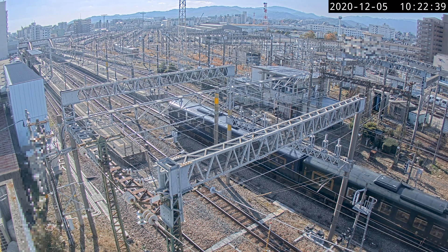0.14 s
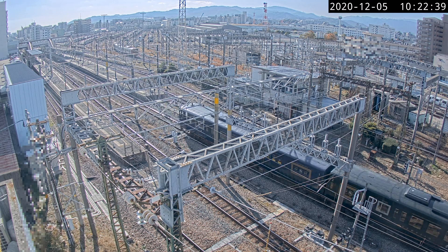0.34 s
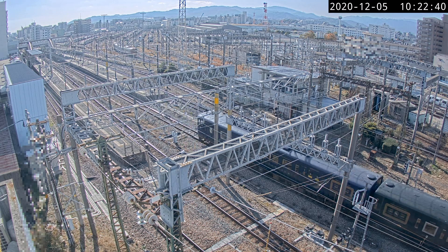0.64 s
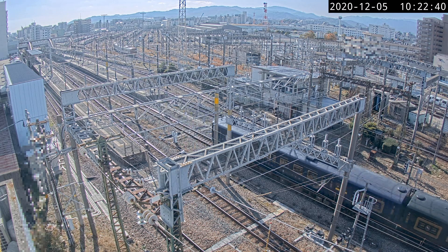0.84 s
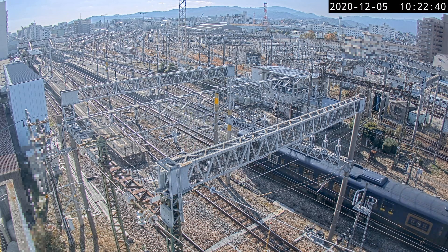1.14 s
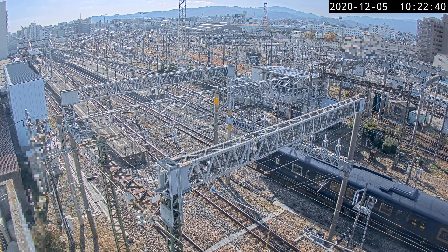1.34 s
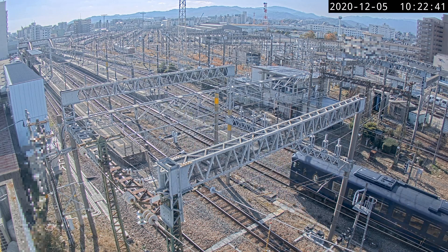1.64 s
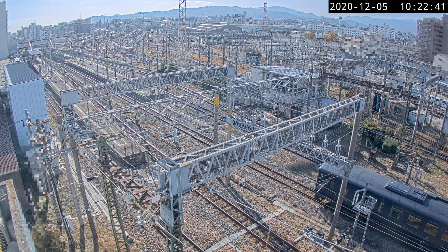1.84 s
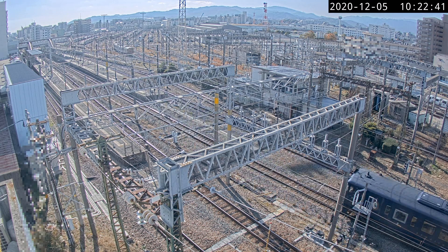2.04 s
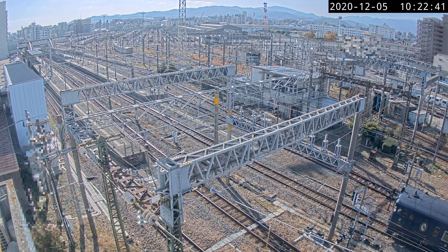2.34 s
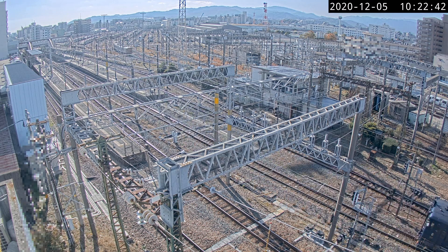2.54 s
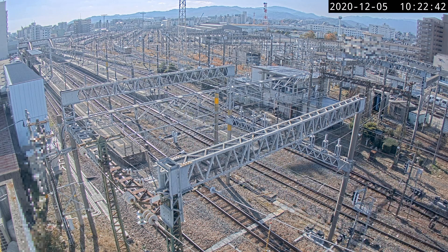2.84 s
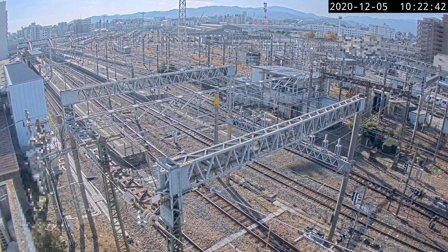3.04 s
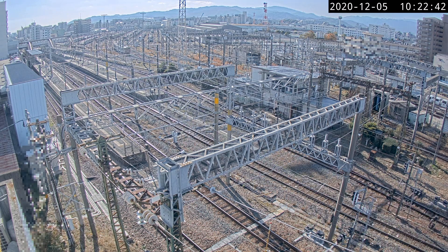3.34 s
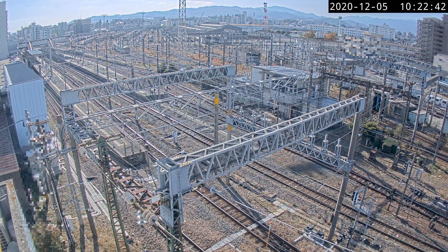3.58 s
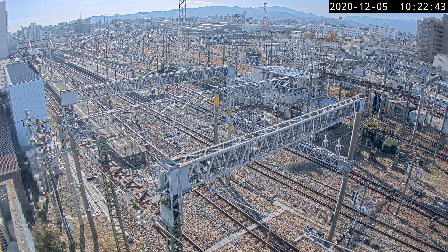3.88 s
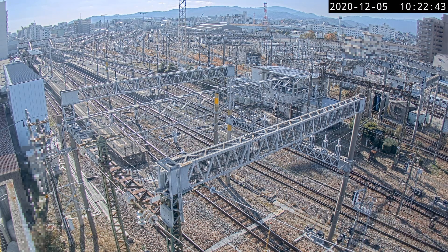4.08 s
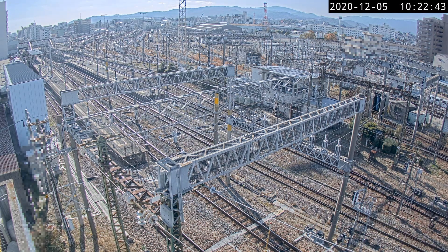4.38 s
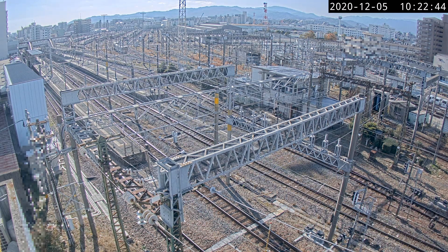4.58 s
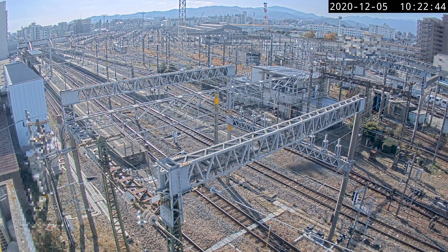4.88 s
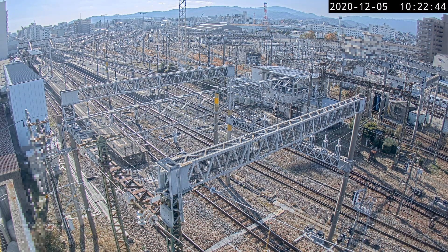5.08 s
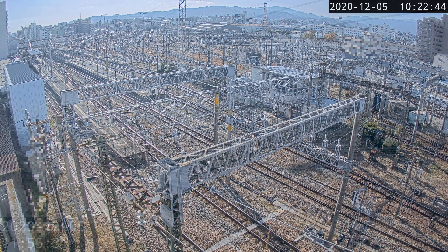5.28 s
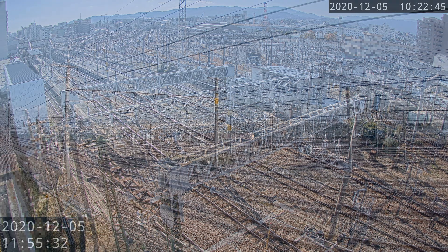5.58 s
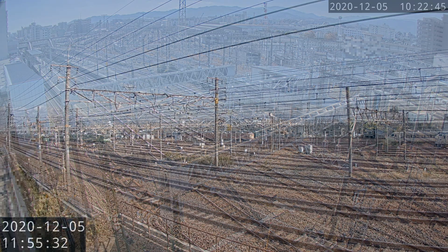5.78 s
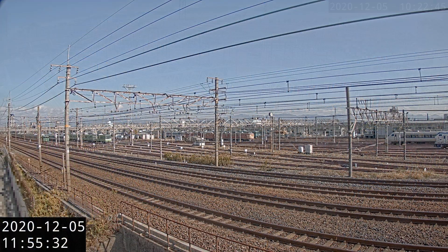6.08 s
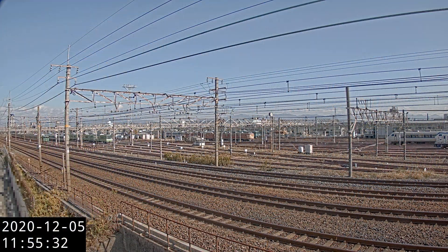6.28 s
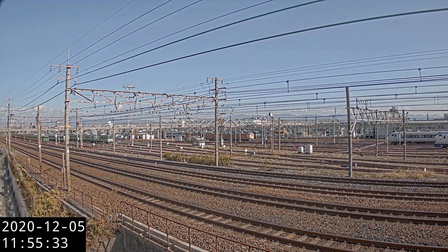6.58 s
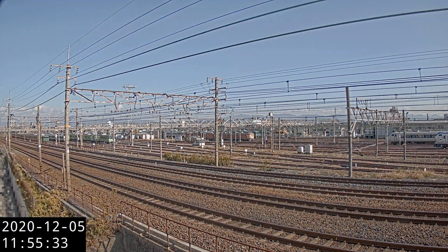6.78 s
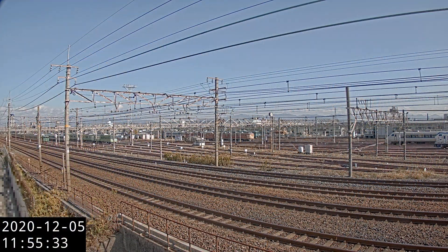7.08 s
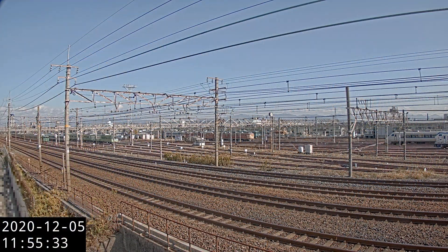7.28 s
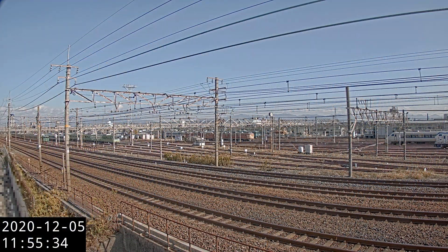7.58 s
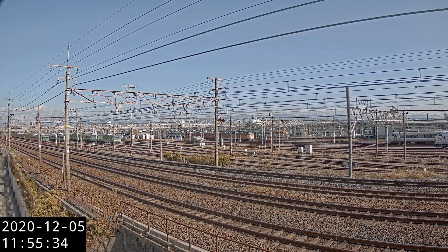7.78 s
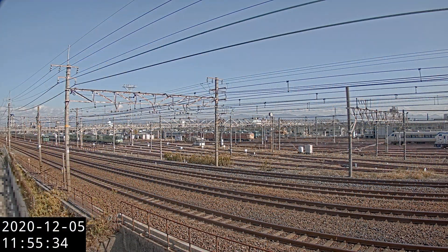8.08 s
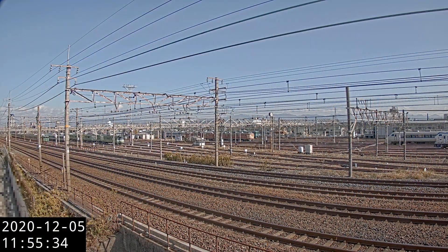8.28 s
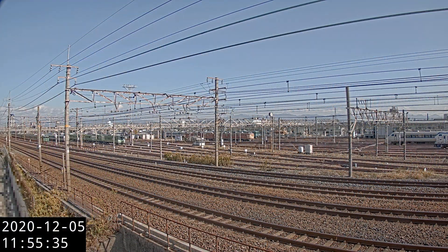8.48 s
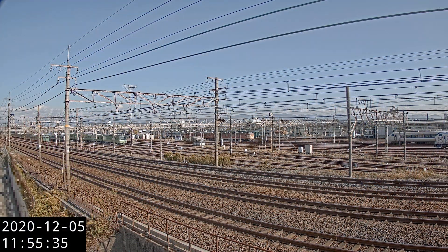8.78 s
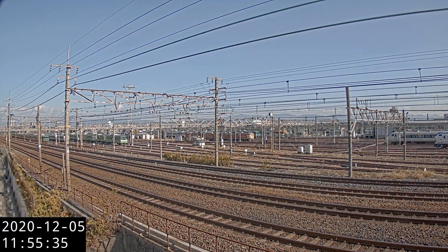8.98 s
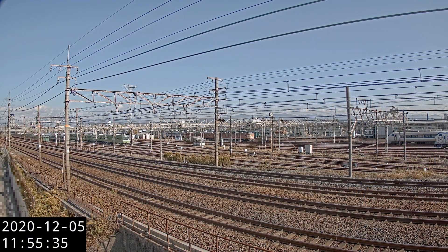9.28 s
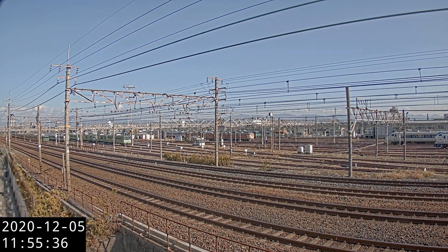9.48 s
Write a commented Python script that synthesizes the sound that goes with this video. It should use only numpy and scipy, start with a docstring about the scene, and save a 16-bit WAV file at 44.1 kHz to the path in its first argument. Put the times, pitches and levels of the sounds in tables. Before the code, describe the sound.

Steely train roar with thin piercing flange whines and dull joint thuds fades away, giving way to a quiet open yard's low hum.

```python
"""An electric train rolls through a wide rail yard below a fixed outdoor camera and draws away.
Its wheel roar is filtered noise in four bands; two flanges sing as trembling sines that sink as they fade.
Thuds, a drone, rumble and ringing rails join in. The sound then dissolves to the faint murmur of
another yard, made of steady noise bands. Resonances of each camera's housing colour the roar and
the murmur; both channels are alike."""
import sys
import numpy as np
from scipy import signal
from scipy.fft import rfft, irfft, next_fast_len
from scipy.io import wavfile

SR = 44100
rng = np.random.default_rng(int(sys.argv[2]) if len(sys.argv) > 2 else 0)


def materialize(psi):
    """Save the field psi as 16-bit PCM at rate SR to the path in sys.argv[1].

    A 1-D psi becomes a single channel; in a 2-D psi each row is a channel.
    """
    bounded = np.clip(np.atleast_2d(psi).T, -1, 1)
    quanta = np.round(bounded * 32767).astype(np.int16)
    wavfile.write(sys.argv[1], SR, quanta)


N = 424669
TIME = np.arange(N) / SR  # s
FREQ = np.linspace(1, SR / 2, 8192)  # Hz, the grid of every spectrum
FADE_START_S, FADE_END_S = 5.35, 6.078  # the train dissolves into the quiet yard

# Standing waves in the housing of the camera over the train.
# Each row: centre in Hz, width in Hz, peak or notch in dB.
TRAIN_HOUSING = [(797, 427, 9), (1080, 510, -4.5), (2224, 1240, 12), (2802, 543, -12), (4143, 380, 7),
                 (4875, 793, -6.5), (5820, 1500, 5), (6500, 520, -6.5), (7300, 836, 3)]
# How these change for sound from behind the camera.
# Each row: centre in Hz, width in Hz, peak or notch in dB.
REAR_CHANGE = [(345, 350, 5), (2156, 210, -6.5), (2390, 260, 1.5), (2900, 900, -4), (3930, 320, 5.5),
               (4600, 300, -4), (5230, 2300, 7), (8700, 1300, 10.5), (9850, 700, -2), (10500, 700, 6),
               (12700, 840, -8)]
# Standing waves in the housing of the second camera.
# Each row: centre in Hz, width in Hz, peak or notch in dB.
QUIET_HOUSING = [(852, 217, 15), (990, 420, -12), (2177, 780, 14), (2720, 510, -9.5), (3690, 1295, 10.5),
                 (4820, 278, -8.2), (5429, 740, 8), (8800, 1500, -5)]


def undb(db):
    """The decibel is logarithmic: twenty of them multiply the amplitude by ten."""
    return 10 ** (np.asarray(db) / 20)


def unit(x):
    """Effective strength is the root mean square, scaled here to one."""
    return x / np.sqrt(np.mean(x ** 2))


def curves(table):
    """Linear interpolation in time of every column after the first, which holds seconds."""
    seconds, *columns = np.transpose(table)
    return [np.interp(TIME, seconds, column) for column in columns]


def colour(points):
    """Spectral envelope: gain per frequency from (Hz, dB) points, joined on a logarithmic pitch axis."""
    hz, db = np.transpose(points)
    return undb(np.interp(np.log(FREQ), np.log(hz), db))


def resonances(modes):
    """Resonance: each mode adds a bell-shaped peak or notch in dB to the gain per frequency."""
    total_db = 0
    for hz, width_hz, db in modes:
        detuning = 2 * (FREQ - hz) / width_hz
        total_db = total_db + db / (1 + detuning ** 2) ** 2
    return undb(total_db)


def band(low_hz, high_hz, order=16):
    """Band-pass gain: neighbouring bands that share an edge and order add up to flat power."""
    below = (low_hz / FREQ) ** order
    above = (FREQ / high_hz) ** order
    return ((1 + below) * (1 + above)) ** -.5


def noise(gain):
    """Spectral shaping: white noise takes the given gain per frequency, at unit rms."""
    size = next_fast_len(N, True)
    bin_hz = np.arange(size // 2 + 1) * SR / size
    spectrum = rfft(rng.standard_normal(size)) * np.interp(bin_hz, FREQ, gain)
    return unit(irfft(spectrum, size)[:N])


def walk(rate_hz):
    """Random modulation: chance values, rate_hz of them a second, joined by lines at unit rms."""
    knots = rng.standard_normal(N // 10)
    return unit(np.interp(TIME * rate_hz, np.arange(len(knots)), knots))


def strike(start_s, decay_s, rise_s):
    """Damped impact: the envelope of a blow rises quickly and falls exponentially."""
    age_s = np.maximum(TIME - start_s, 0)
    return (1 - np.exp(-age_s / rise_s)) * np.exp(-age_s / decay_s)


def swell(centre_s, half_s):
    """Gaussian envelope: a smooth rise and fall, one at its centre."""
    return np.exp(-((TIME - centre_s) / half_s) ** 2)


def gone(halfway_s, scale_s):
    """Sigmoid transition: a smooth step from zero to one as the train leaves."""
    return .5 + .5 * np.tanh((TIME - halfway_s) / (2 * scale_s))


def microphone_hiss(db=-88):
    """Self-noise: the microphone adds a thin, even hiss."""
    return noise(band(8000, 16200)) * undb(db)


def patter(db=-84):
    """Amplitude modulation: uneven flicker turns a noise band into very faint crackling in the air."""
    flicker_db = np.clip(3 * walk(70), -6, 4)
    return noise(resonances(QUIET_HOUSING) * band(5000, 10500, order=10)) * undb(db + flicker_db)


def yard():
    """Superposed distant sources: wavering noise of far traffic and town, with a thin hiss of air above."""
    # Spectrum of the murmur. Each row: frequency in Hz, relative level in dB.
    murmur = [(25, -3.5), (60, 4.5), (150, -13), (400, -11), (700, -7.5), (1400, -23.5), (3500, -28.5),
              (7000, -40), (10500, -46), (15500, -66)]
    shape = colour(murmur) * resonances(QUIET_HOUSING)
    ground_db = -61 + 1.1 * walk(5.8)
    traffic_db = -54.5 + .5 * walk(6.6)
    air_db = -70 + 4 * swell(8.76, half_s=0.56) + .5 * walk(20)  # one soft swell of the hiss
    ground = noise(shape * band(18, 94)) * undb(ground_db)
    traffic = noise(shape * band(108, 2500)) * undb(traffic_db)
    air = noise(shape * band(2800, 16000)) * undb(air_db)
    return ground + traffic + air


def ticks():
    """Transient excitation: brief noise bursts near the microphone, coloured by the housing, tick and rattle."""
    # Each row: start in seconds, level in dB, rise in seconds, decay in seconds, lowest Hz, highest Hz.
    small_blows = [(5.325, -63, .004, 0.024, 5500, 8500), (5.455, -48, 0.0036, 0.023, 5200, 6800),
                   (5.49, -54, 0.0064, 0.038, 5500, 11000), (8.515, -56, 0.01, 0.045, 2900, 3200),
                   (8.61, -57, .001, 0.0078, 5200, 6500), (8.655, -54, .001, 0.01, 2200, 8000)]
    out = 0
    for start_s, db, rise_s, decay_s, low_hz, high_hz in small_blows:
        modes = [*TRAIN_HOUSING, *REAR_CHANGE] if start_s < FADE_END_S else QUIET_HOUSING
        burst = noise(resonances(modes) * band(low_hz, high_hz, order=10))
        out = out + undb(db) * strike(start_s, decay_s, rise_s) * burst
    return out


def rumble():
    """Ground-borne vibration: low noise wavers and eases as the train goes, with a few deeper buffets."""
    # Each row: centre in seconds, half length in seconds, level in dB.
    low_buffets = [(.13, .07, -44), (2.117, 0.07, -40), (3.98, .04, -44), (4.73, .07, -43),
                   (5.04, 0.17, -47)]
    level_db, fall_db_per_s, waver_db = -48.5, 1.1, 1.7
    buffets = sum(undb(db) * swell(s, half_s) for s, half_s, db in low_buffets)
    steady = undb(level_db - fall_db_per_s * TIME + waver_db * walk(8))
    return noise(band(42, 110, order=4)) * steady + noise(band(26, 80, order=6)) * buffets


def running_gear(db=-50):
    """Frequency modulation: the running gear's wavering drone comes and goes, strongest at 3.55 s."""
    # Each row: time in seconds, pitch in Hz, loudness as a gain.
    drone = [(0, 141, .4), (1.25, 145.5, 1.03), (1.7, 144, .4), (2.4, 146, .9), (2.9, 143, .3),
             (3.55, 137, 1.5), (3.85, 135, 0.086)]
    hz, loudness = curves(drone)
    phase = 2 * np.pi * np.cumsum(hz + 3 * walk(13)) / SR
    return np.sin(phase) * loudness * undb(db + 3 * walk(5.0))


def joints():
    """Impact excitation: wheels thud dully over rail joints, smeared by the yard."""
    # Each row: start in seconds, level in dB.
    thuds = [(0.799, -29.5), (2.26, -31), (2.77, -33.5), (3.295, -46), (3.44, -39), (3.96, -45),
             (5.231, -38.5), (5.298, -34), (5.44, -31.5)]
    blows = sum(undb(db) * strike(s, decay_s=.06, rise_s=0.0028) for s, db in thuds)
    return blows * noise(resonances(TRAIN_HOUSING) * band(170, 470, order=4))


def narrow_hiss(centre_hz, width_hz):
    """Narrow-band noise: only frequencies close to the centre pass."""
    return noise(1 / (1 + (2 * (FREQ - centre_hz) / width_hz) ** 4))


def rails():
    """Free vibration: the rails' narrow hiss swells and dies as the last coach leaves."""
    ring = narrow_hiss(5750, width_hz=700)
    return ring * undb(-50 + 1.2 * walk(25)) * swell(3.45, half_s=.6)


def bites():
    """Superposition of flange bites: pressure, then gains of upper wheel, scraping and lower wheel."""
    # A flange bites against the rail and both wheels sing.
    # Each row: centre in seconds, half length in seconds, pressure from 0 to 1, upper wheel in dB,
    # scraping in dB, lower wheel in dB.
    flange_bites = [(.08, 0.32, 0.1, -53, -42.5, -46), (0.638, 0.19, 0, -59.5, -56, -44.5),
                    (1.14, 0.14, 0.6, -34.5, -39, -46), (1.335, .08, 0.3, -39, -45, -53.5),
                    (1.87, 0.25, 0.9, -38, -37, -58), (2.445, .16, 0.5, -33.5, -38.5, -49.5),
                    (2.693, 0.11, 0, -48, -47, -44.5), (3.01, 0.047, 0, -44, -59, -70),
                    (3.345, 0.19, 0, -45.5, -46.5, -75), (3.736, 0.16, .1, -52, -52, -80),
                    (4.095, .06, 0, -57, -65, -85)]
    total = 0
    for s, half_s, pressure, *levels_db in flange_bites:
        strengths = [pressure, *undb(levels_db)]
        total = total + np.outer(strengths, swell(s, half_s))
    return total


def singing(hz, wobble_hz, flutter_db):
    """Stick-slip keeps a wheel mode going: its pitch trembles and its grip comes and goes."""
    phase = 2 * np.pi * np.cumsum(hz + wobble_hz * walk(220)) / SR
    return unit(np.sin(phase) * undb(flutter_db * walk(55)))


def flanges(upper, scraping, lower):
    """Self-excited vibration: two wheels whine, scraping follows the upper pitch, rubbing stays near 9800 Hz."""
    # from 3.15 s both whines dive ever faster for two seconds, losing 2220 Hz in the first
    dive_hz = 2220 * np.clip(TIME - 3.15, 0, 2) ** 1.3
    # until then the upper pitch sinks slowly at first, the lower one evenly
    start_hz, sag_hz_per_s, sag_growth_hz_per_s2 = 10005, 50, 56
    low_start_hz, low_sag_hz_per_s = 9640, 80
    hz = start_hz - sag_hz_per_s * TIME - sag_growth_hz_per_s2 * TIME ** 2 / 2 - dive_hz
    low_hz = low_start_hz - low_sag_hz_per_s * TIME - dive_hz
    upper_whine = singing(hz, wobble_hz=28.4, flutter_db=4.0) * upper
    lower_whine = singing(low_hz, wobble_hz=26, flutter_db=1.5) * lower
    # the scraping fills a narrow band around the upper tone, centred slightly below it, with faint wide skirts
    scrape_half_width_hz, scrape_drop_hz, skirt_hz, skirt_share = 210, 40, 800, .23
    core = (1 + (FREQ / scrape_half_width_hz) ** 6) ** -.5
    skirts = skirt_share / (1 + (FREQ / skirt_hz) ** 2)
    spread = core + skirts
    # low noise on two carriers in quadrature moves up to the pitch of the wheel
    phase = 2 * np.pi * np.cumsum(hz - scrape_drop_hz) / SR
    scrape = noise(spread) * np.cos(phase) + noise(spread) * np.sin(phase)
    # light rubbing stays in a fixed band and fades as the train leaves
    rub_fade = 1 - gone(halfway_s=3.25, scale_s=0.17)
    rub = narrow_hiss(9800, width_hz=880) * undb(-44.5) * rub_fade
    return upper_whine + lower_whine + (scrape * scraping + rub) * undb(2.2 * walk(40))


def rolling(pressure):
    """Roughness excitation: treads shake wheels and rails; treble dies first as the train moves behind."""
    # Spectrum of the rolling noise. Each row: frequency in Hz, relative level in dB.
    tread_spectrum = [(25, -11.5), (60, -13), (130, -6.5), (250, -6.5), (500, 0.0), (1400, -9.5),
                      (3500, -10), (8000, -22.5), (11000, -26.5), (15500, -40)]
    # Rail and sleeper resonances in the roar. Each row: centre in Hz, width in Hz, peak or notch in dB.
    track_modes = [(369, 60, -3), (535, 54, 2), (625, 80, 0.5), (840, 130, 1.5), (978, 140, 0.5)]
    # Wheel sets surge over rougher rail. Each row: centre in seconds, half length in seconds,
    # rise of the rail ring in dB, rise of the hiss in dB.
    rough_rail = [(.25, 0.34, 1.7, 1.7), (1.08, 0.35, 1.7, 3), (2.26, 0.37, 0.2, 3), (2.836, 0.19, 2.6, 1),
                  (3.414, 0.17, 1.5, 2), (5.4, 0.17, 1, 2.5)]
    # Each band holds, then sinks as the last coach leaves.
    # Each row: level in dB, halfway down in seconds, time scale of the fall in seconds, fall in dB.
    roar_law = (-31, 4, 0.5, 4.5)
    ring_law = (-31.5, 4, 0.24, 9)
    hiss_law = (-36, 3.5, 0.41, 15)
    sizzle_law = (-46, 3.5, 0.3, 19.5)
    recede_per_s = 0.14  # further share of the fall for each second past halfway
    roar_share, bite_sizzle_db = .4, 4.5  # roar per dB of ring surge; sizzle added at full pressure

    front = colour(tread_spectrum) * resonances(track_modes) * resonances(TRAIN_HOUSING)
    rear = front * resonances(REAR_CHANGE)
    turn = np.clip((TIME - 3.15) / 0.99, 0, 1)  # power passes from front to rear
    contact = walk(45)  # the grinding contact patch flutters all bands together
    ring_db, hiss_db = sum(np.outer(rises_db, swell(s, half_s)) for s, half_s, *rises_db in rough_rail)

    def part(shape, law, rise_db, flutter_db):
        """Equal-power crossfade of one band from front to rear, under its law of decay."""
        db, halfway_s, scale_s, fall_db = law
        away = gone(halfway_s, scale_s) + recede_per_s * np.maximum(TIME - halfway_s, 0)
        sound = np.sqrt(1 - turn) * noise(front * shape) + np.sqrt(turn) * noise(rear * shape)
        return sound * undb(db - fall_db * away + rise_db + flutter_db * contact)

    sizzle_db = bite_sizzle_db * pressure + hiss_db / 2
    roar = part(band(110, 1100), roar_law, roar_share * ring_db, flutter_db=0.3)
    ring = part(band(1100, 2750), ring_law, ring_db, flutter_db=0.7)
    hiss = part(band(2660, 8500), hiss_law, hiss_db, flutter_db=0.75)
    sizzle = part(band(8500, 16000, order=30), sizzle_law, sizzle_db, flutter_db=1.5)
    return roar + ring + hiss + sizzle


def scene():
    """Linear superposition: the train dissolves into the quiet yard, both channels alike."""
    fade = np.clip((TIME - FADE_START_S) / (FADE_END_S - FADE_START_S), 0, 1)
    pressure, upper, scraping, lower = bites()
    train = rolling(pressure) + flanges(upper, scraping, lower)
    train = train + rails() + joints() + running_gear() + rumble()
    quiet = yard() + patter()
    mono = train * (1 - fade) ** 1.26 + quiet * fade + ticks() + microphone_hiss()
    return np.array([mono, mono])


def record(dry):
    """Low-pass filtering: the camera cuts steeply above 15720 Hz."""
    # order 12, 0.1 dB ripple, 80 dB rejection
    low_pass = signal.ellip(12, .1, 80, 15720, fs=SR, output="sos")
    return signal.sosfilt(low_pass, dry)


dry = scene()
out = record(dry)
materialize(out)
```